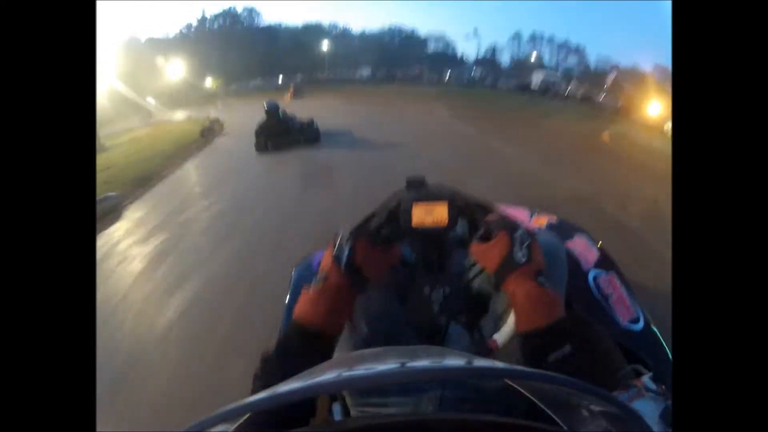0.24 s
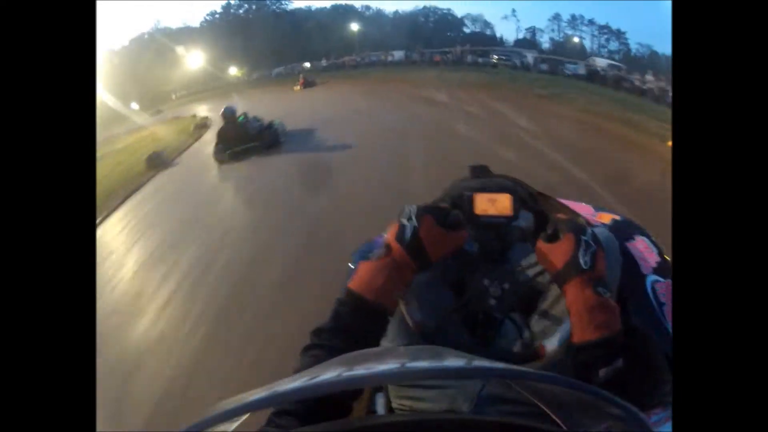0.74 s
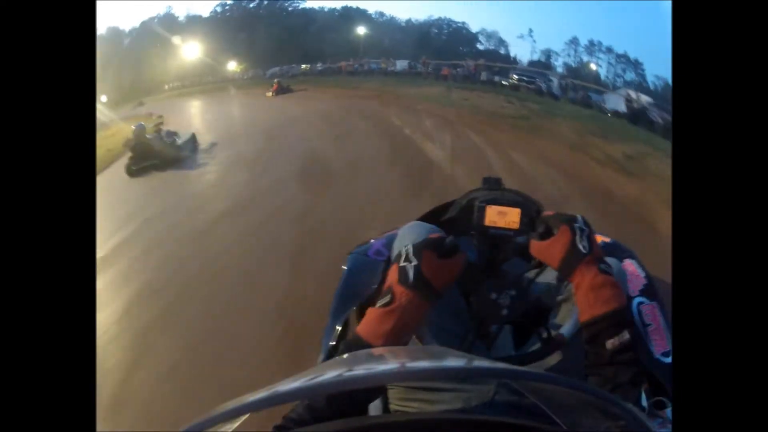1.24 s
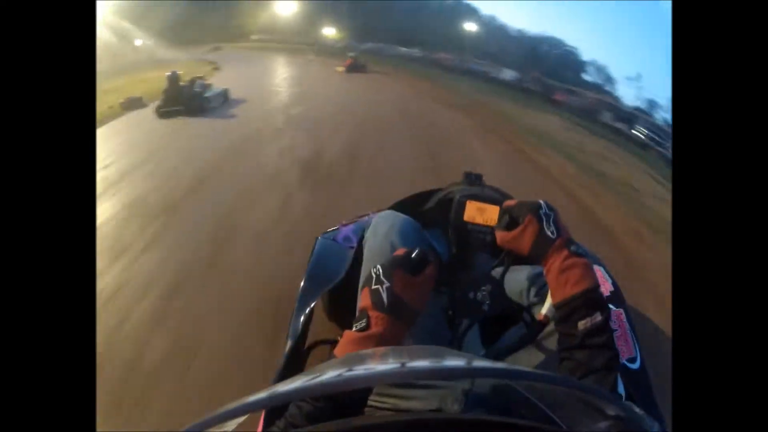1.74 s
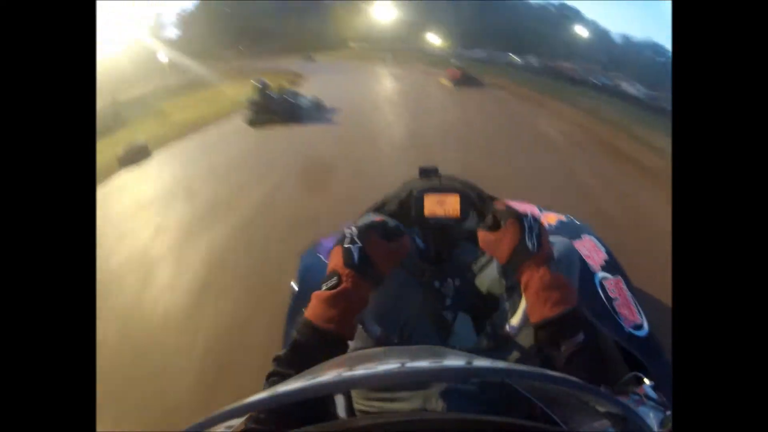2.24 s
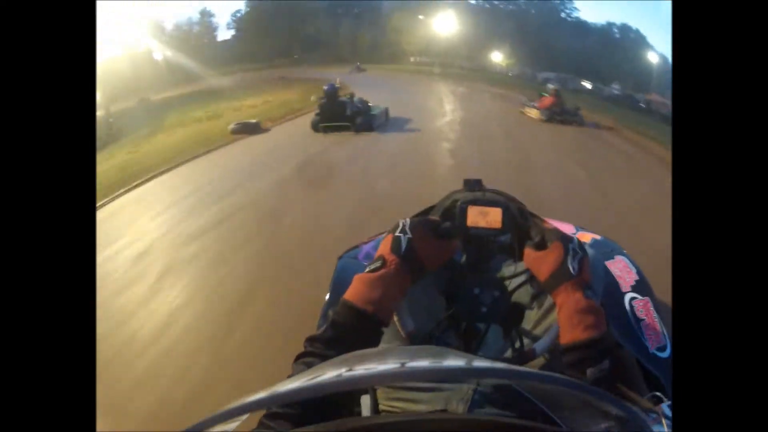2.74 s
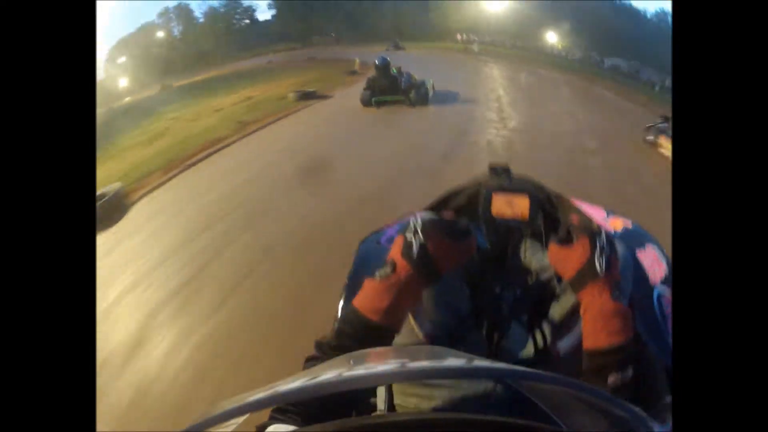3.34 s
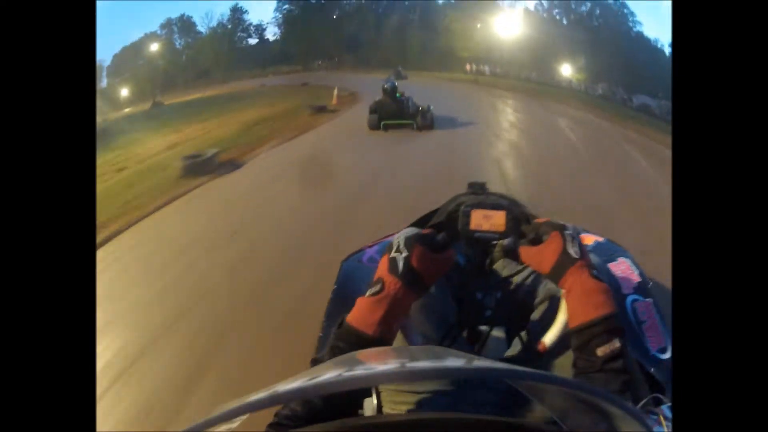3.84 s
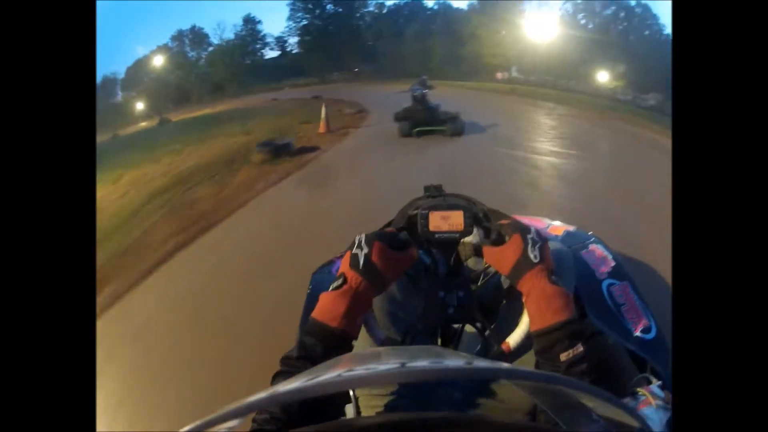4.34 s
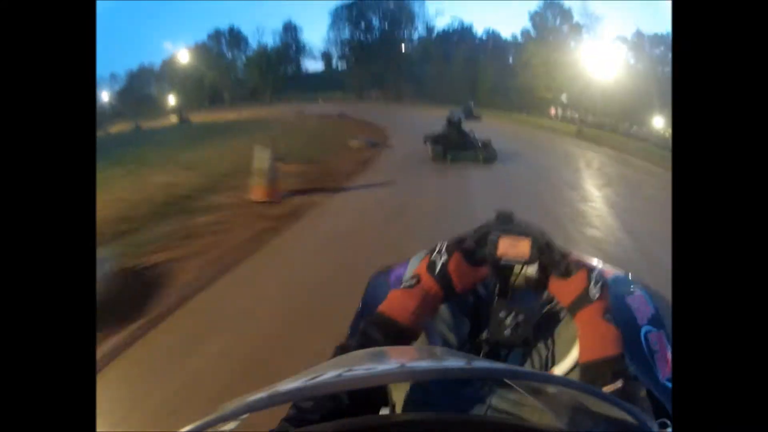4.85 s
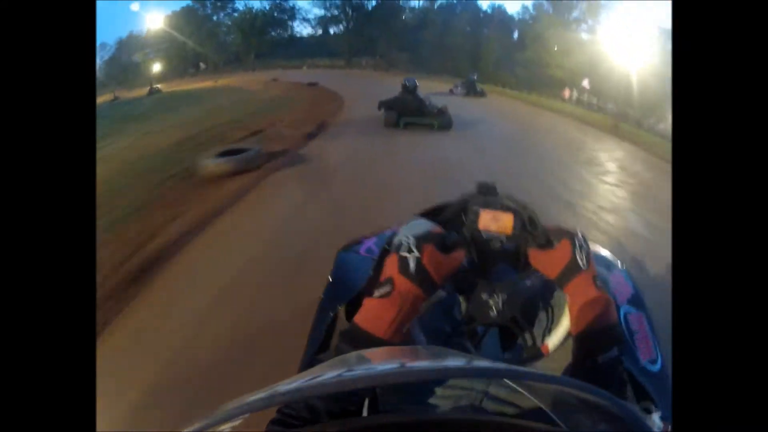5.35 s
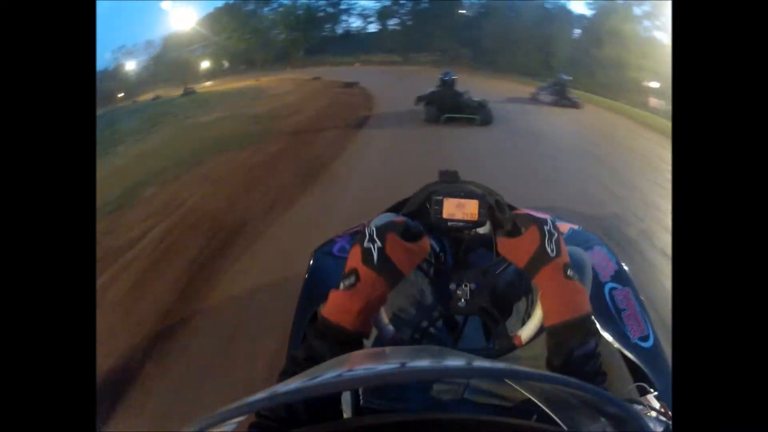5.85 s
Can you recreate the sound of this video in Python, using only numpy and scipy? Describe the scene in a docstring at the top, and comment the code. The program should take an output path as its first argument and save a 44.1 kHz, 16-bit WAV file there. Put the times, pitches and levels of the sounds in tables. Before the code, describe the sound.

A close helmet view of a four-stroke kart racing on dirt. It starts with the engine running down: a sinking drone around 200 Hz, soft puffs, gritty clatter and chassis rumble, with a dull low knock near 0.3 s. At 0.5 s four hard barks crack out in a tenth of a second, joined by smaller knocks until 0.7 s. Similar surges of four to seven rapid barks come at 1.1, 1.4, 1.7, 2.1, 2.8, 3.5, 3.8, 4.4, 4.6, 5.1, 5.5 and 6.0 s, the engine slowing between them. Another kart putters throughout at about thirty raspy puffs a second, stronger near 2.7, 5.3 and at the end. Soft low gusts swell around 2.7, 4.0, 4.4 and 4.9 s; a faint knock falls at 2.5 s and a sharper, higher thump at 4.3 s. The camera case gives a boxy, metallic, slightly harsh ring.

```python
"""From the start a kart engine runs down with soft puffs, over clatter, a drone, rumble and wind.
Another kart putters nearby all the while: even firings make a hum and raspy bursts of noise.
From half a second on, short surges of hard barks break in: shocks ring the exhaust pipe and gas tears out.
Between surges the engine slows again; gusts swell up and jolts knock the frame from time to time.
All of it is heard on the driver's helmet, through a camera's case that rings and colours the sound."""
import sys
import numpy as np
from scipy import signal
from scipy.fft import rfft, irfft
from scipy.io import wavfile
from scipy.ndimage import uniform_filter1d, map_coordinates

SR = 44100
rng = np.random.default_rng(int(sys.argv[2]) if len(sys.argv) > 2 else 0)


def unload_wav(signal):
    """Save mono or channel-first audio to the path in sys.argv[1] as 16-bit WAV at rate SR, clipped to [-1, 1]."""
    wavfile.write(
        sys.argv[1],
        SR,
        np.round(np.clip(np.atleast_2d(signal).T, -1, 1) * 32767).astype(np.int16),
    )


N = 269451
TIME = np.arange(N) / SR  # seconds

# All levels in the tables are relative: layers are mixed and coloured further on.
# surges of power: (first firing [s], last firing [s], firings [count], speed-up [share],
# place of the loudest firing [0-1], first level [dB], peak level [dB], last level [dB])
POWER_SURGES = [(0.5, 0.6099, 4, 0.15, 0.67, -12, -10.5, -12.5),
                (1.0891, 1.212, 5, 0.13, 0.51, -11, -11.5, -14),
                (1.4106, 1.535, 5, 0.091, 0.33, -15, -10.5, -14.5),
                (1.6749, 1.8665, 7, 0.091, 0.6, -15.5, -11.5, -14),
                (2.1398, 2.2777, 5, 0.17, 0.82, -16, -10.5, -17),
                (2.7637, 2.871, 4, 0.27, 0.33, -12.5, -10.5, -12.5),
                (3.514, 3.613, 4, 0.11, 0.67, -13, -10.5, -15),
                (3.7985, 3.977, 7, 0.11, 0.33, -16, -10.5, -12.5),
                (4.3653, 4.476, 4, 0.14, 0.5, -16, -10, -13.5),
                (4.6072, 4.75, 6, 0.072, 0.72, -13, -9.5, -13),
                (5.089, 5.251, 6, 0.22, 0.38, -14, -10.5, -14.5),
                (5.5206, 5.6803, 6, 0.15, 0.54, -15.5, -10, -14),
                (6.0047, 6.104, 4, 0.15, 0.36, -13, -11.5, -11.5)]
# the run-down before each surge, in the same order: (starting speed [turns/s], slowing [turns/s per s],
# clatter [dB], rumble [dB], shaking [dB]), with levels as they are at racing speed
RUN_DOWNS = [(65.1, 118, -25.5, -25.5, -36.5), (64.87, 42, -25, -25, -44), (72, 135, -27, -26.5, -42),
             (65.06, 98.6, -27.5, -24.5, -42), (67, 125, -27, -24, -44), (65.03, 68, -26, -26.5, -40),
             (66, 45, -25, -24.5, -36), (70.15, 65.5, -24.5, -25.5, -35.5), (72, 160, -26.5, -25, -42.5),
             (65.96, 100.4, -25.5, -25.5, -39), (72, 150, -26, -25, -40), (67, 100, -27.5, -24.5, -39),
             (68, 110, -26, -23, -41)]
# how strongly an engine harmonic sounds at each pitch: (pitch [Hz], level [dB])
DRONE_RESONANCES = [(60, -13), (95, -8), (140, -4.5), (175, -6.5), (210, 2), (250, -12), (330, -15),
                    (500, -25.5), (700, -21)]
NEIGHBOUR_RESONANCES = [(120, -12), (200, -5.5), (280, -17.5), (355, -8), (450, -21.5), (540, -17),
                        (595, -20), (680, -26)]
# noise colours, how strong each pitch is: (pitch [Hz], level per Hz [dB])
BARK_COLOUR = [(150, -4), (400, -6.5), (700, -9.5), (1200, -2), (2400, -3), (4500, -11), (9000, -18.5),
               (15000, -9)]
CLATTER_COLOUR = [(150, -15), (400, -11), (700, -8), (1200, -2), (2400, -3), (4500, -14), (9000, -19),
                  (15000, -8)]
RUMBLE_COLOUR = [(25, -33), (60, -9.5), (110, -7.5), (160, -7), (210, 5.5), (255, -7), (350, -19.5),
                 (500, -9), (900, -39), (3000, -71)]
WIND_COLOUR = [(10, -24), (25, -6), (45, -38), (70, -6), (200, -27), (1000, -78)]
RASP_COLOUR = [(200, -11), (800, -11.5), (1600, 3), (2400, -9), (3000, 7.5), (3700, -16.5), (5000, -4),
               (9000, -18), (15000, -1)]
# shaking of the unbalanced piston: (multiple of the turning rate, level [dB])
CRANK_ORDERS = [(1, 1), (2, 0.5)]
# the neighbouring kart over time: (time [s], firing rate [1/s], level [dB])
NEIGHBOUR_KART = [(0, 31, -36.5), (.9, 29.1, -36), (1.95, 29.6, -38.5), (2.65, 29, -31.5),
                  (3.05, 33.2, -34), (3.65, 26.7, -35.5), (4.4, 30.4, -37.5), (5.3, 28.1, -32.5),
                  (5.75, 30.2, -37), (6.11, 28.3, -29.5)]
# gusts on the helmet: (middle [s], time from the middle to 1/e of the peak [s], peak level [dB])
WIND_GUSTS = [(2.72, .1, -44), (3.999, 0.039, -46.5), (4.35, .08, -47), (4.88, .14, -44)]
# ringing tones of the exhaust pipe: (pitch [Hz], level [dB], time to fall by 60 dB [s])
PIPE_MODES = [(187.4, 1, 0.058), (277.6, -5, 0.054), (460, -14.5, 0.025)]
# knocks as the kart jolts: (time [s], strength of the blow [dB], lowest pitch [Hz], time to fall by 60 dB [s])
TRACK_JOLTS = [(0.326, -18, 37.7, 0.19), (.53, -20, 38, .12), (.675, -17, 36, 0.21),
               (2.493, -22, 48.96, 0.25), (4.287, -3.5, 129.3, .055)]
# resonances and dips of the camera case: (pitch [Hz], width [Hz], lift or cut [dB])
CASE_RESONANCES = [(691, 19, 4), (1082, 30, -1.5), (1920, 55, -2.5), (2630, 45, 3), (908, 60, 11),
                   (1177, 93, 3), (1734, 115, 12), (2372, 59, 5), (2863, 89, -9.5), (3160, 65, 6.5),
                   (3400, 73, -3.5), (3570, 130, 11), (3800, 207, 8.5), (3920, 116, -6), (4770, 86, -4.5),
                   (5120, 120, 8), (6000, 170, -11.5), (6880, 290, 7.5), (7230, 77, -4.5),
                   (8405, 140, 16.5), (8900, 140, 8), (9150, 120, -4.5), (9655, 130, 7.5),
                   (10250, 140, 12.5), (11330, 360, -5), (12340, 496, -16.5), (13730, 80, 8),
                   (15150, 130, 1), (15670, 340, -19.5)]

IDLE_TURNS_PER_S, RACING_TURNS_PER_S = 43, 67
PICK_UP_S = .09  # the engine gathers speed this long before the first hard bark
# how much louder each layer is at racing speed than at idle
CLATTER_SWING_DB, RUMBLE_SWING_DB, SHAKE_SWING_DB = 5, 6, 9.5
HUM_CARRIES = 0.34  # share of the neighbour's change in level that its hum does not follow
BREEZE_DB, BREEZE_SWING_DB, BREEZE_CHANGES_PER_S = -52, 4, 8.9
TRACK_ECHO_S, TRACK_ECHO_DB = .0056, -13
CUTOFF_HZ = 15500


def from_db(db):
    """Turn decibels into a plain gain."""
    return 10 ** (np.asarray(db) / 20)


def rms_one(x):
    """Scale a signal to an average (rms) strength of 1."""
    return x / np.sqrt(np.mean(x ** 2) + 1e-20)


def in_time(rows):
    """Draw straight lines between the rows of a table, giving each column at every sample."""
    s, *columns = np.transpose(rows)
    return [np.interp(TIME, s, column) for column in columns]


def drift(changes_per_s):
    """Wander smoothly and at random around zero, with an rms of 1."""
    knots = rng.standard_normal(N // 32)
    return rms_one(map_coordinates(knots, [TIME * changes_per_s], order=3, mode="wrap"))


def colour(x, spectrum, size=8192):
    """Filter to the given spectrum, with no sound ahead of its cause; white noise keeps its level."""
    hz, db = np.transpose(spectrum)
    grid = np.maximum(np.fft.rfftfreq(size, 1 / SR), 1)
    gain = rms_one(from_db(np.interp(np.log(grid), np.log(hz), db)))
    # folding the cepstrum forward in time makes the filter minimum-phase
    cepstrum = irfft(np.log(gain))
    cepstrum[1:size // 2] *= 2
    cepstrum[size // 2 + 1:] = 0
    response = irfft(np.exp(rfft(cepstrum)))
    return signal.fftconvolve(x, response)[:N]


def clicks(times, sizes):
    """Place one single-sample click of the given size at each time."""
    out = np.zeros(N)
    at = np.round(times * SR).astype(int)
    inside = (at >= 0) & (at < N)
    out[at[inside]] = sizes[inside]
    return out


def ring(x, hz, t60):
    """Ring like a struck object: a click of 1 starts a dying sine of height 1."""
    r = from_db(-60 / (t60 * SR))
    w = 2 * np.pi * hz / SR
    return signal.lfilter([0, np.sin(w)], [1, -2 * r * np.cos(w), r * r], x + 1e-18)


def fade(x, seconds):
    """Jump to 1 at a click of 1, then die away to 1/e in the given time."""
    return signal.lfilter([1], [1, -np.exp(-1 / (seconds * SR))], x + 1e-18)


def firings():
    """Time the power strokes: each kicks the flywheel, so they close up within a surge."""
    times, levels = [], []
    for first, last, count, speed_up, peak_at, *db in POWER_SURGES:
        u = np.linspace(0, 1, int(round(count)))
        times.append(first + (last - first) * (u + speed_up * u * (1 - u)))
        levels.append(np.interp(u, [0, np.clip(peak_at, .1, .9), 1], db))
    return times, levels


def engine_speed(surges):
    """Turns per second: two per firing in a surge, then friction slows the crank evenly, down to idle."""
    points, start = [], 0
    for times, (top, slowing, *_) in zip(surges, RUN_DOWNS):
        end = max(times[0] - PICK_UP_S, start)
        for s in np.linspace(start, end, num=12):
            points.append((s, max(top - slowing * (s - start), IDLE_TURNS_PER_S)))
        middles = (times[:-1] + times[1:]) / 2
        points += zip(middles, 2 / np.diff(times))
        start = times[-1]
    return in_time(points)[0]


def running_levels(surges, turns_per_s):
    """Clatter, rumble and shaking [dB]: each run-down has its own strength, and all sink with the speed."""
    starts = [0] + [times[-1] for times in surges[:-1]]
    points = []
    for start, times, run_down in zip(starts, surges, RUN_DOWNS):
        points += [(s, *run_down[2:]) for s in (start, times[0])]
    # 0 at racing speed, 1 at idle
    slack = (RACING_TURNS_PER_S - turns_per_s) / (RACING_TURNS_PER_S - IDLE_TURNS_PER_S)
    swings = (CLATTER_SWING_DB, RUMBLE_SWING_DB, SHAKE_SWING_DB)
    return [db - swing_db * slack for db, swing_db in zip(in_time(points), swings)]


def clatter(cycle, depth_db=1.0, flicker_db=2.3, grit_db=-7, grit_per_s=450):
    """Valve gear, chain and tyres: a hiss that throbs with the crank, with small uneven ticks in it."""
    throb = from_db(depth_db * np.cos(4 * np.pi * cycle) + flicker_db * drift(170))
    ticks = (rng.random(N) < grit_per_s / SR) * rng.standard_normal(N)
    hiss = rng.standard_normal(N) + from_db(grit_db) * rms_one(ticks)
    return colour(rms_one(throb * hiss), CLATTER_COLOUR)


def harmonics(cycle, spectrum, waver_db, count):
    """Multiples of the cycle rate glide through fixed resonances; moving air shakes level and phase."""
    hz, db = np.transpose(spectrum)
    log_rate = np.log(np.gradient(cycle) * SR)
    out = 0
    for k in range(3, count):
        resonance_db = np.interp(log_rate + np.log(k), np.log(hz), db)
        level = from_db(resonance_db + waver_db * drift(8))
        phase = k * cycle + rng.random() + .06 * drift(14)
        out = out + np.sqrt(2) * level * np.sin(2 * np.pi * phase)
    return out


def drone(cycle, surges):
    """The smooth hum of the engine running down: under power it gives way to the barks."""
    under_power = sum(1. * ((TIME > s[0]) & (TIME < s[-1] + .02)) for s in surges)
    pulling = uniform_filter1d(under_power, size=900)
    return from_db(-6 - 4.5 * pulling) * harmonics(cycle, DRONE_RESONANCES, waver_db=2.0, count=20)


def rumble():
    """Low chassis noise that lurches on the uneven track."""
    lurch = from_db(-6.0 + 1.8 * drift(13))
    return lurch * colour(rng.standard_normal(N), RUMBLE_COLOUR)


def crank(cycle, waver_db=2.0):
    """The unbalanced piston shakes the frame at low multiples of the turning rate, two turns a cycle."""
    out = 0
    for k, db in CRANK_ORDERS:
        level = np.sqrt(2) * from_db(db + waver_db * drift(9))
        out = out + level * np.sin(2 * np.pi * (2 * round(k) * cycle + rng.random()))
    return out


def neighbour(hum_db=-2, rasp_db=8, puff_s=0.011):
    """Another kart's even firings hum in its pipe, each with a rasp of gas."""
    per_s, level_db = in_time(NEIGHBOUR_KART)
    cycle = np.cumsum(per_s) / SR
    pulses = np.diff(np.floor(cycle), prepend=0)
    hum = harmonics(cycle, NEIGHBOUR_RESONANCES, waver_db=3.5, count=23)
    # taking away a faster fade softens the start of each puff
    puffs = fade(pulses, puff_s) - fade(pulses, 0.00087)
    rasp = colour(puffs * rng.standard_normal(N), RASP_COLOUR)
    # the hum carries farther than the rasp, so its level changes less
    carry_db = HUM_CARRIES * (level_db.mean() - level_db)
    return from_db(level_db) * (from_db(hum_db + carry_db) * hum + from_db(rasp_db) * rasp)


def wind():
    """An unsteady stream of air over the helmet, with a few gusts that swell and die."""
    breeze = from_db(BREEZE_DB + BREEZE_SWING_DB * drift(BREEZE_CHANGES_PER_S))
    gusts = sum(from_db(db) * np.exp(-((TIME - s) / width_s) ** 2) for s, width_s, db in WIND_GUSTS)
    return (breeze + gusts) * colour(rng.standard_normal(N), WIND_COLOUR)


def idle_strokes(surges, cycle):
    """Between surges the exhaust valve still opens once a cycle, at the pace of the slowing engine."""
    starts = [.026] + [s[-1] for s in surges[:-1]]
    ends = [s[0] for s in surges]
    times = []
    for start, end in zip(starts, ends):
        first, last = np.interp([start, end], TIME, cycle)
        times.append(np.interp(np.arange(first + 1, last - .5), cycle, TIME))
    return np.concatenate(times)


def exhaust(times, db, pipe_db, shock_db, jet_db, tail_db, knock_db, spread_db, steepen):
    """The valve opens: a shock rings the pipe and a jet of gas tears out after it."""
    chance = rng.standard_normal((len(times), 2 + len(PIPE_MODES)))
    size = from_db(db + spread_db * chance[:, 0])
    pipe = 0
    for k, (hz, mode_db, t60) in enumerate(PIPE_MODES):
        blow = -size * from_db(mode_db + 1.2 * chance[:, 2 + k])
        pipe = pipe + ring(clicks(times, blow), hz, t60)
    # the narrow mouth radiates little bass
    pipe = signal.sosfilt(signal.butter(2, 125, "high", fs=SR, output="sos"), pipe)
    # stronger shocks are steeper, so their crack grows faster than their thud
    crack = size * (size / np.median(size)) ** steepen
    # the shock comes back from the track and the seat
    shock = clicks(times, -crack)
    shock = shock + clicks(times + 0.001124, -crack * from_db(chance[:, 1]))
    shock = shock + clicks(times + 0.0033, 0.4 * crack)
    jet = clicks(times, crack)
    swell = fade(jet, .0024) - .75 * fade(jet, .0011)
    # combustion noise builds up in the block for 8 ms before the valve opens
    knock_times = (times[:, None] + [-.008, 0, .001]).ravel()
    knock = np.interp(TIME, knock_times, (size[:, None] * [0, 1, 0]).ravel())
    flow = from_db(jet_db) * swell + from_db(tail_db) * fade(jet, 0.014) + from_db(knock_db) * knock
    bark = colour(from_db(shock_db) * shock + flow * rng.standard_normal(N), BARK_COLOUR)
    # the bark returns once more from the track
    echo = from_db(TRACK_ECHO_DB) * np.interp(TIME - TRACK_ECHO_S, TIME, bark, left=0)
    return from_db(pipe_db) * pipe + bark + echo


def jolts():
    """A dull knock through seat and frame, whose three lowest modes answer together."""
    out = 0
    for s, db, hz, t60 in TRACK_JOLTS:
        blow = clicks(np.array([s]), from_db([db]))
        out = out + ring(blow, hz, t60)
        out = out - 1.26 * ring(blow, 1.16 * hz, t60)
        out = out + 0.69 * ring(blow, 2.18 * hz, t60)
    return .5 * out


def scene():
    """The surges set the engine's speed, and the speed drives everything that turns with it."""
    surges, levels = firings()
    turns_per_s = engine_speed(surges)
    cycle = np.cumsum(turns_per_s / 2) / SR  # four-stroke: one cycle is two turns
    clatter_db, rumble_db, shake_db = running_levels(surges, turns_per_s)
    mix = from_db(clatter_db - 4.5) * clatter(cycle)
    # drone and rumble rise and sink together
    mix = mix + from_db(rumble_db) * (drone(cycle, surges) + rumble())
    mix = mix + from_db(shake_db) * crank(cycle)
    mix = mix + neighbour() + wind()
    idle = idle_strokes(surges, cycle)
    puffs = exhaust(idle, np.interp(idle, TIME, clatter_db), pipe_db=-0.5, shock_db=1, jet_db=2.0,
                    tail_db=-6.5, knock_db=-8.5, spread_db=1.0, steepen=0.093)
    barks = exhaust(np.concatenate(surges), np.concatenate(levels), pipe_db=0.5, shock_db=3.5, jet_db=1.5,
                    tail_db=-11.5, knock_db=-12, spread_db=-0.04, steepen=0.56)
    return (mix + puffs + jolts() + barks)[None]


def camera_case(x):
    """Each resonance of the case lifts, and each dip cuts, a narrow band."""
    for hz, width, db in CASE_RESONANCES:
        w, half, gain = 2 * np.pi * hz / SR, np.pi * abs(width) / SR, from_db(db)
        lift = half * max(gain, 1)
        cut = half * max(1 / gain, 1)
        middle = -2 * np.cos(w)
        x = signal.lfilter([1 + lift, middle, 1 - lift], [1 + cut, middle, 1 - cut], x)
    return x


def record(dry):
    """The case colours the sound, the highest peaks are rounded, the top of the treble is cut."""
    top = .95  # the rounded peaks level off here, ahead of the treble cut
    heard = camera_case(dry)
    heard = heard / (1 + (heard / top) ** 4) ** .25
    return signal.sosfilt(signal.ellip(10, .1, 90, CUTOFF_HZ, fs=SR, output="sos"), heard)


dry = scene()
out = record(dry)
unload_wav(out)
```